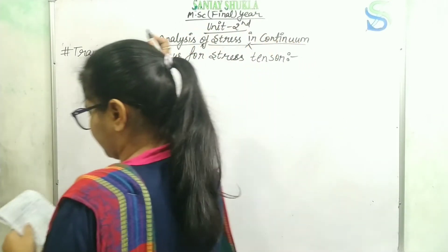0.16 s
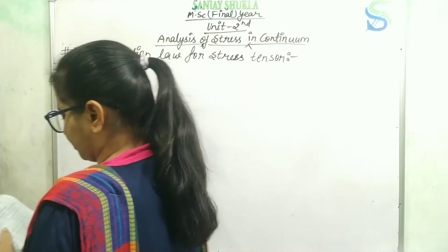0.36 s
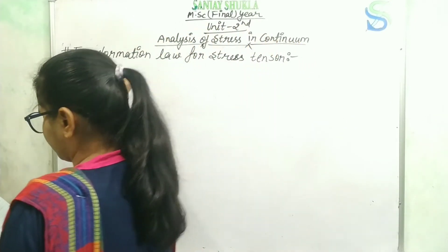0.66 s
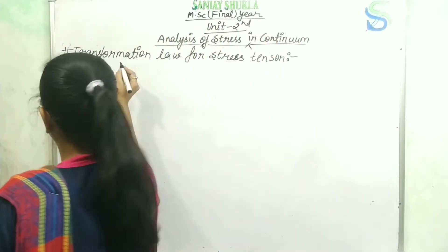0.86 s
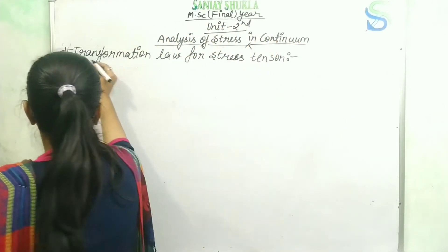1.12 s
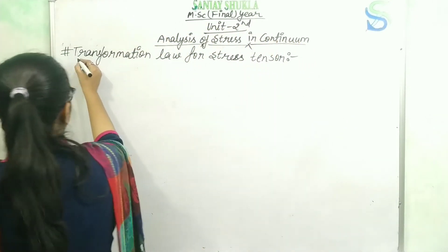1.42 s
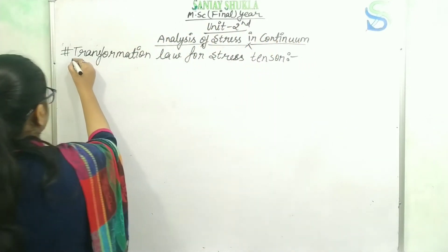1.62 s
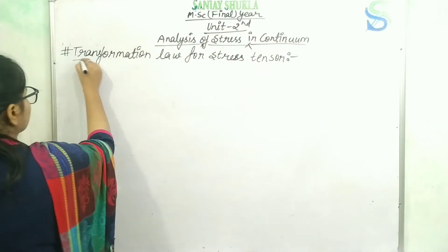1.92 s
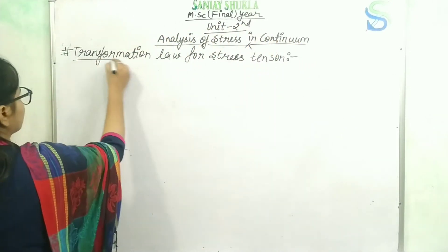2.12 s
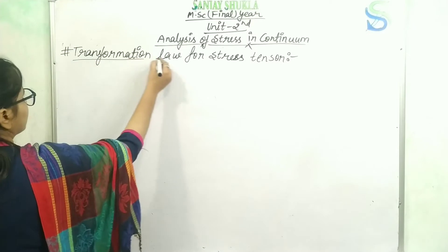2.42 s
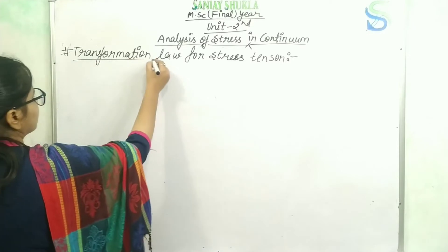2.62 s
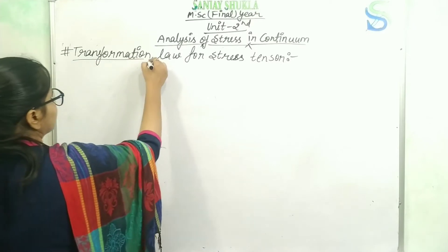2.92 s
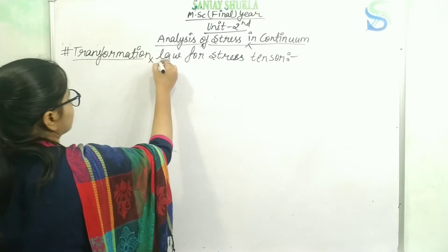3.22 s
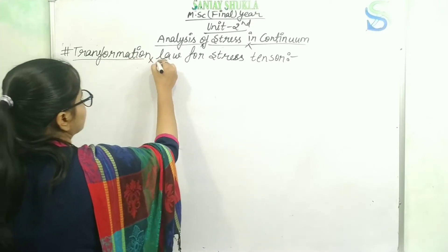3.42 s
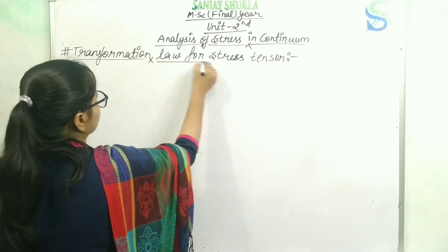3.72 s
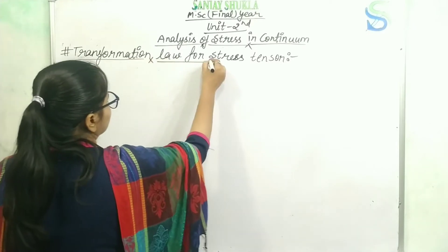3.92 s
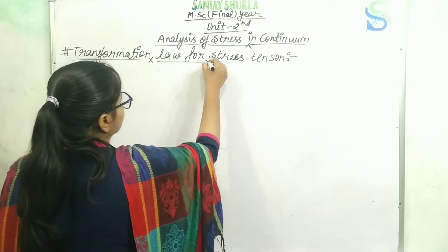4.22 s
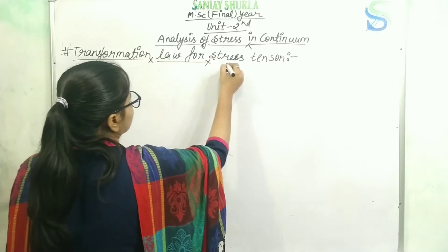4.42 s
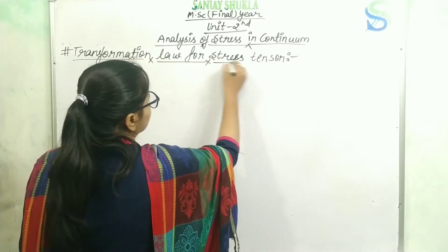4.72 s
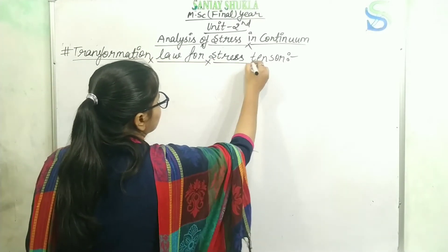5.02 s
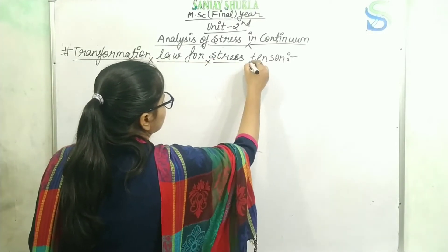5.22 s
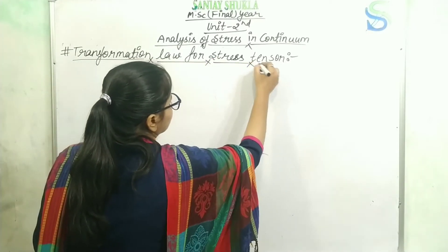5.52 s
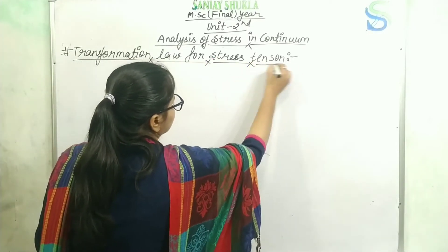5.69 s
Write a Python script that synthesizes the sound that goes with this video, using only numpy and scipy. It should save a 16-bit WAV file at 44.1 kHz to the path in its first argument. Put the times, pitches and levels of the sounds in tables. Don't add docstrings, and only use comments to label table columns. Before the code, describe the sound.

A person moves beside a whiteboard: soft cloth rustles, paper crackles, a hard desk bump and a few distant wooden knocks. Then a felt marker lands with dull panel thuds and short dry hissing strokes, while the board sways with deep low wobble. A low hum swells behind in a bare, lightly echoing classroom. One fixed microphone, narrow and mono, some distance away.

```python
import sys
import numpy as np
from scipy import signal
from scipy.io import wavfile

SR = 44100
rng = np.random.default_rng(int(sys.argv[2]) if len(sys.argv) > 2 else 0)


def store_pcm(level_fs):
    pcm = np.round(np.clip(level_fs, -1, 1) * 32767).astype(np.int16)
    wavfile.write(sys.argv[1], SR, np.atleast_2d(pcm).T)


def to_linear_factor(level_db):
    exponent = np.asarray(level_db, float) / 20
    return 10 ** exponent


N = 258245

# (time [s], level [dB])
ARM_LEAN = [(0, -36.5), (.52, -44), (.85, -50.5), (1.0, -45.5), (1.25, -58), (1.52, -43), (1.68, -49),
            (2.05, -40), (2.46, -37.5), (2.64, -44.5), (3.35, -35.5), (3.75, -41.5), (4.03, -39),
            (4.16, -31.5), (5.07, -32), (5.2, -37), (5.76, -26.5), (5.86, -26.5)]
# (time [s], hold [s], level [dB])
HAND_PUSHES = [(0.097, .03, -44.5), (1.0, 0.035, -44.5), (2.827, 0.15, -35), (3.129, .1, -32.5),
               (3.49, 0.17, -40), (3.913, 0.061, -35), (4.158, .12, -32.5), (4.416, 0.11, -36),
               (4.69, .03, -34), (5.326, 0.49, -36), (5.773, .1, -29.5)]
# (time [s], peak [dB], contact [ms], share of ring time [1])
TIP_LANDINGS = [
    (2.758, -40, 2.34, 0.85),
    (2.996, -39, 2.44, 0.58),
    (3.434, -40, 4.2, 0.98),
    (3.884, -44.5, 3.2, 1),
    (4.136, -33.5, 2.15, 0.9),
    (4.606, -40, 2.9, 0.97),
    (4.959, -37.5, 2.5, 0.52),
    (5.212, -35.5, 2.84, 0.66),
]
# (frequency [Hz], level [dB], t60 [s])
PANEL_MODES = [(142.2, -6, 0.4), (184.3, -4, 0.15), (228.15, -4, 0.22), (285.8, -1, 0.21),
               (329.4, -0.5, 0.12), (362.6, -0.5, 0.092), (421, -4, .09), (534, -12, 0.19),
               (609, -11.5, 0.097), (750, -22, 0.034)]
# (time [s], hold [s], hiss [dB], body re hiss [dB])
FELT_STROKES = [(2.834, 0.018, -75.5, -1), (3.06, 0.019, -74.5, 0.5), (3.516, 0.11, -77, 2.5),
                (3.66, .06, -76, 1.5), (3.835, 0.023, -81.5, 4.5), (3.88, .06, -80.5, -2),
                (3.969, 0.027, -76, -5), (4.117, .02, -82.5, 8), (4.179, 0.04, -72.5, 2),
                (4.351, 0.038, -82.5, 4.5), (4.44, 0.13, -84.5, 2), (4.662, 0.12, -76.5, 3.5),
                (5.026, 0.042, -74.5, -5), (5.275, .02, -74, 1.5), (5.48, 0.015, -89.5, -1),
                (5.552, 0.0092, -85, -8.5), (5.614, 0.07, -76, -0.5), (5.703, .03, -74, 3),
                (5.795, 0.024, -82.5, 5)]
# (time [s], hold [s], hiss [dB], sheen re hiss [dB], body re hiss [dB])
CLOTH_RUSTLES = [(0.023, .03, -78, -5, 12.5), (0.104, .07, -80.5, -10, 12), (0.25, 0.23, -96.5, -2.5, 16.5),
                 (0.493, 0.069, -83, -4.5, 13.5), (0.578, 0.015, -79.5, -1, 10.5),
                 (0.643, .01, -77, -0.5, 8), (0.866, .05, -85, -4.5, 7), (0.941, .005, -82.5, -1.5, 4),
                 (0.983, .005, -70, -13, 8), (1.08, .2, -94, -6, 14), (1.439, .01, -79, -3, 13.5),
                 (1.737, 0.006, -71, -16, 3), (1.835, .06, -78, -3, 2.5), (1.969, .015, -71.5, -1.5, 4.5),
                 (2.051, .21, -78, -4.5, 3), (2.644, 0.0089, -69.5, -7, 9.5)]
# (time [s], hold [s], hiss [dB], sheen re hiss [dB], body re hiss [dB])
PAPER_CREASES = [(0.683, 0.014, -77, -3, 11), (0.736, 0.012, -76, -9, 7.5), (0.79, 0.013, -77, -6, 9),
                 (1.387, 0.035, -72.5, 1.5, 1.5), (1.495, 0.018, -73, -23, 10.5),
                 (1.68, 0.011, -80, -4, 9.5), (1.747, 0.042, -69.5, -4.5, 5.5),
                 (2.503, .003, -83, -9.5, 13), (2.36, .2, -92, -8, 13), (2.61, 0.028, -74.5, -7, 14.5),
                 (3.271, 0.0027, -81, -9, 8.5)]
# (frequency [Hz], density [dB/Hz])
HISS_SPECTRUM = [(1100, -26), (1900, -10.5), (2600, 1.5), (3300, 1.5), (4300, -3), (5200, 0), (6800, -25),
                 (11000, -100)]
# (frequency [Hz], density [dB/Hz])
SHEEN_SPECTRUM = [(3060, -35), (5200, -16.5), (6790, -9.5), (7460, -12.5), (8000, -9.5), (10400, -42),
                  (17600, -120)]
# (frequency [Hz], density [dB/Hz])
BODY_SPECTRUM = [(290, -28.5), (520, -2), (900, -1), (1500, -7), (2200, -5), (3000, -12), (4500, -31),
                 (7000, -100)]
# (time [s], peak [dB], centre [Hz], half width [octaves], t60 [s])
TICKS = [(.651, -57, 7030, .2, .06), (.676, -53.5, 3300, 0.51, 0.12),
         (.736, -53.5, 2700, 0.37, .13), (1.491, -52.5, 3010, 0.2, 0.22),
         (1.680, -53, 2790, 1.7, 0.081), (1.712, -52, 2800, 0.35, 0.22),
         (1.751, -48, 1750, 0.4, 0.26), (2.507, -57.5, 1800, 1.7, 0.06),
         (2.603, -55, 2100, 0.42, 0.43), (3.002, -63, 900, .5, .06),
         (3.275, -58.5, 1790, 1.7, 0.061), (3.848, -56.5, 2880, 0.47, 0.13),
         (3.875, -56, 3200, 0.99, 0.089), (4.963, -63, 900, 0.48, .06),
         (5.217, -54, 750, 0.41, 0.14), (4.14, -59.5, 806, .4, 0.097)]
# (time [s], peak [dB], contact [ms], share of ring time [1])
DESK_BUMP = [
    (0.624, -30.5, 0.89, 0.45),
]
# (frequency [Hz], level [dB], t60 [s])
DESK_MODES = [(264.2, -10, 0.56), (416.5, -5, 0.44), (455, -11.5, 0.87), (660, -9, 0.36), (717, -1, 0.2),
              (820, 4.5, 0.086), (900, 9, 0.057), (1040, -2, 0.18), (1086, -12, 0.16), (1276, -4, 0.13)]
# (time [s], peak [dB], contact [ms], share of ring time [1])
WOOD_KNOCKS = [(.793, -55, 0.6, .6), (.814, -58.5, 0.92, 0.81), (1.79, -59, 3.2, 0.38),
               (1.376, -42, 1.14, 0.39), (1.398, -50, 0.48, 0.95), (1.408, -53, 0.66, 0.57),
               (1.424, -48.5, 0.75, 1), (1.443, -47, 0.95, 0.53), (1.462, -57, 0.66, 0.7),
               (1.494, -54, 0.67, 0.56), (1.935, -30.5, 1.03, 0.54), (2.255, -40.5, 1.5, 1.1)]
# (frequency [Hz], level [dB], t60 [s])
WOOD_MODES = [(547, -5, 0.051), (630, -2.5, 0.057), (711, 0, 0.075), (810, -4, 0.058), (869, -1.5, 0.024),
              (983, -12, 0.15), (1137, -6.5, 0.06), (1412, -10, 0.11), (1560, -12, 0.066)]
# (time [s], hold [s], level [dB], pitch [Hz])
DRONE_SWELLS = [(0.382, .06, -58, 65.68), (0.709, .05, -59, 67.1), (0.955, .18, -57, 66.06),
                (1.319, .45, -52.5, 66.93), (1.917, .14, -60, 68.07), (2.263, 0.11, -57, 65.06),
                (2.579, .1, -53, 68.14), (2.856, .03, -57, 63.03), (3.096, 0.32, -50.5, 65.72),
                (3.417, .7, -48.5, 65.09), (4.181, 0.062, -45.5, 66.5), (4.374, 0.046, -48, 64.7),
                (4.635, 0.035, -50, 63.1), (4.954, 0.051, -49.5, 63.3), (5.244, 0.064, -48, 66),
                (5.575, .1, -54, 65.8), (5.79, 0.054, -51, 66.7)]
# (time [s], pitch [Hz], level [dB])
MOTOR = [(0, 463, -85), (.4, 469, -87), (.55, 464, -68.5), (1.1, 464, -72.5), (1.25, 458, -83),
         (1.6, 472.5, -71.5), (2.1, 478.6, -98.5)]
# (frequency [Hz], density [dB/Hz])
ROOM_SPECTRUM = [(44, -28.5), (75, -7), (91, -3.5), (125, -13), (300, -13), (519, -23.5), (631, -21.5),
                 (915, -28), (1110, -27.5), (2430, -43), (7260, -47), (8000, -55), (10400, -85),
                 (17600, -120)]
# (frequency [Hz], density [dB/Hz])
RUMBLE_SPECTRUM = [(18, -15), (26, -3.5), (45, -6), (90, -15), (150, -16), (300, -31.5), (500, -90.5)]
# (time [s], gain [dB])
TRAFFIC_GAIN = [
    (0, -3.5),
    (1.2, -4),
    (1.75, 5.5),
    (2.5, 3.5),
    (2.9, -2),
    (4.8, -0.5),
    (5.1, 4),
    (5.86, 0),
]


def panel_sway():
    first_mode = partial(7.8, to_linear_factor(in_time(ARM_LEAN)[0]), 0.045, 1.0)
    second_mode = partial(18.0, shake(), 0.0721, 1.0)
    build_up = np.interp(np.arange(N) / SR, [0, .12], [.1, 1])
    return (first_mode + second_mode) * build_up


def shake():
    rest_db, rise_db_s, fall_db_s = -50, 147, 42.5
    pushes = [swell(*row, rise_db_s, fall_db_s) for row in HAND_PUSHES]
    return height([to_linear_factor(2 * rest_db)] + pushes)


def thuds():
    return strike(TIP_LANDINGS, PANEL_MODES, lag_s=0.0019, spot_db=2.53, room_db=-32.5, room_t60_s=0.39,
                  first_echo_s=0.0098, wall_share=0.22)


def rubbing():
    grains_per_s, spread_db = 9000, 2.2
    felt_sheen_db = -5
    rubs = [(swell(s, hold_s, db, 501, 219), felt_sheen_db, body_db) for s, hold_s, db, body_db in FELT_STROKES]
    rubs += [(swell(s, hold_s, db, 199, 199), *colour) for s, hold_s, db, *colour in CLOTH_RUSTLES]
    rubs += [(swell(s, hold_s, db, 2501, 229), *colour) for s, hold_s, db, *colour in PAPER_CREASES]

    size_db = spread_db * np.minimum(rng.exponential(1, (2, N)), 4)
    sizes = to_linear_factor(size_db) * rng.choice([-1, 1], (2, N))
    grains = sizes * (rng.random((2, N)) < grains_per_s / SR)

    hiss_height = height(power * np.clip(1 - to_linear_factor(2 * sheen_db), .08, 1) for power, sheen_db, _ in rubs)
    sheen_height = height(power * to_linear_factor(2 * sheen_db) for power, sheen_db, _ in rubs)
    body_height = height(power * to_linear_factor(2 * body_db) for power, _, body_db in rubs)
    hiss = to_linear_factor(1.76) * hiss_height * coloured(grains, HISS_SPECTRUM, patchy_db=2.0)
    sheen = sheen_height * coloured(grains[:, ::-1], SHEEN_SPECTRUM, patchy_db=2.5)
    body = body_height * coloured(grains[::-1], BODY_SPECTRUM, patchy_db=1.5)
    return hiss + sheen + body


def ticks():
    out = np.zeros(N + SR)
    for s, peak_db, hz, octaves, t60_s in TICKS:
        path = reflections(-21.0, t60_s, 0.0039)
        edges_hz = np.clip(hz * 2 ** (octaves * np.array([-1, 1])), 30, .4 * SR)
        band = signal.butter(2, edges_hz, "band", fs=SR, output="sos")
        heard = signal.sosfilt(band, path)
        at = round(s * SR)
        out[at:at + len(heard)] += to_linear_factor(peak_db - 1.9) * heard / np.abs(heard).max()
    return out[:N]


def desk_bump():
    return strike(DESK_BUMP, DESK_MODES, lag_s=0.00087, spot_db=0.12, room_db=-30.0, room_t60_s=0.43,
                  first_echo_s=0.0078, wall_share=0.15)


def wood_knocks():
    return strike(WOOD_KNOCKS, WOOD_MODES, lag_s=0.00098, spot_db=3.0, room_db=-31.5, room_t60_s=0.4,
                  first_echo_s=0.0065, wall_share=0.63)


def drone():
    rest_db, rise_db_s, fall_db_s = -67.5, 180, 159
    s, hold_s, _, hz = np.transpose(DRONE_SWELLS)
    swells = [swell(*row[:3], rise_db_s, fall_db_s) for row in DRONE_SWELLS]
    gain = height([to_linear_factor(2 * rest_db)] + swells)
    pitch_hz = np.interp(np.arange(N) / SR, s + hold_s / 2, hz)
    return partial(pitch_hz, gain, .006, 0.51)


def whine():
    width_hz = 30
    hz, level_db = in_time(MOTOR)
    r, w = np.exp(-np.pi * width_hz / SR), 2 * np.pi * hz.mean() / SR
    poles = [1, -2 * r * np.cos(w), r * r]
    once = signal.lfilter([1, -1], poles, rng.standard_normal(N))
    return to_linear_factor(level_db) * rms_one(signal.lfilter([1], poles, once))


def room_noise():
    room_db, rumble_db, follow = -64, -60, 0.55
    shake_db = 20 * np.log10(shake())
    rumble_level_db = rumble_db + follow * (shake_db - shake_db.mean()) + in_time(TRAFFIC_GAIN)[0]
    rumble = to_linear_factor(rumble_level_db) * coloured(rng.standard_normal((2, N)), RUMBLE_SPECTRUM, 2.1)
    air = to_linear_factor(room_db) * coloured(rng.standard_normal((2, N)), ROOM_SPECTRUM, 1.1)
    return air + rumble


def strike(events, modes, lag_s, spot_db, room_db, room_t60_s, first_echo_s, wall_share):
    out, t = np.zeros(N + SR), np.arange(SR // 2) / SR
    hz, level_db, t60_s = np.transpose(modes)[:, :, None]
    radiates = signal.butter(3, [.85 * hz.min(), 1.15 * hz.max()], "band", fs=SR, output="sos")
    for s, peak_db, contact_ms, ring_share in events:
        mode_db = level_db + spot_db * rng.standard_normal(hz.shape)
        envelope = to_linear_factor(mode_db - 60 * t / (t60_s * ring_share))
        bent_hz = hz * (1 + .02 * rng.standard_normal(hz.shape))
        ringing = (envelope * np.sin(2 * np.pi * bent_hz * t)).sum(axis=0)
        push = np.hanning(max(round(contact_ms * SR / 1000), 3))
        direct = signal.fftconvolve(ringing, push)[:len(t)]
        direct = signal.sosfilt(radiates, direct)
        path = reflections(room_db, room_t60_s, first_echo_s)
        path[round(.0066 * SR)] = wall_share
        heard = signal.fftconvolve(direct, path)[:len(t)]
        at = round((s + lag_s) * SR)
        out[at:at + len(t)] += to_linear_factor(peak_db) * heard / np.abs(direct).max()
    return out[:N]


def reflections(room_db, t60_s, first_echo_s):
    t = np.arange(SR // 2) / SR
    path = to_linear_factor(room_db - 60 * t / t60_s) * rng.standard_normal(len(t)) * np.clip(t / first_echo_s, 0, 1)
    path[0] = 1
    return path


def partial(hz, gain, wobble, flutter_db):
    phase = 2 * np.pi * np.cumsum(hz * (1 + wobble * drift(4.23))) / SR
    flutter = to_linear_factor(flutter_db * drift(9.1))
    return np.sqrt(2) * gain * flutter * np.sin(phase + rng.uniform(0, 2 * np.pi))


def coloured(white, spectrum, patchy_db):
    hz, db = np.transpose(spectrum)
    edges_hz, out = 20 * 2 ** np.arange(0, 8.9, 1 / 3), 0
    for k, (low, high) in enumerate(zip(edges_hz, edges_hz[1:])):
        level_db = np.interp(np.log(low * high) / 2, np.log(hz), db)
        if level_db > -60 and high > hz[0] / 2:
            sos = signal.butter(2, [low, high], "band", fs=SR, output="sos")
            band = signal.sosfilt(sos, white[k % 2])
            out = out + to_linear_factor(level_db + patchy_db * drift(7.7)) * band
    return rms_one(out)


def swell(s, hold_s, level_db, rise_db_s, fall_db_s):
    t = np.arange(0, N + 64, 64) / SR
    below_db = rise_db_s * np.clip(s - t, 0, None)
    after_db = fall_db_s * np.clip(t - s - hold_s, 0, None)
    return to_linear_factor(2 * (level_db - below_db - after_db))


def height(powers):
    total = sum(powers)
    return np.interp(np.arange(N) / 64, np.arange(len(total)), np.sqrt(total))


def drift(rate_hz):
    r = np.exp(-80 * np.pi * rate_hz / SR)
    slow = signal.lfilter([1], [1, -2 * r, r * r], rng.standard_normal(N // 40 + 2002))[2000:]
    return np.interp(np.arange(N) / 40, np.arange(len(slow)), rms_one(slow))


def in_time(rows):
    s, *columns = np.transpose(rows)
    return [np.interp(np.arange(N) / SR, s, c) for c in columns]


def rms_one(x):
    return x / np.sqrt(np.mean(x ** 2) + 1e-20)


def scene():
    board = panel_sway() + thuds() + rubbing()
    objects = ticks() + desk_bump() + wood_knocks()
    background = drone() + whine() + room_noise()
    mix = board + objects + background
    return mix[None]


def band_limit(x):
    return signal.sosfilt(signal.butter(12, 8290, fs=SR, output="sos"), x)


def record(dry):
    opening = np.clip(np.arange(N) / (.008 * SR), 0, 1)
    top_cut = signal.cheby1(9, .2, 7525, fs=SR, output="sos")
    mix = signal.sosfilt(top_cut, dry * opening)
    return band_limit(mix)


dry = scene()
out = record(dry)
store_pcm(out)
```